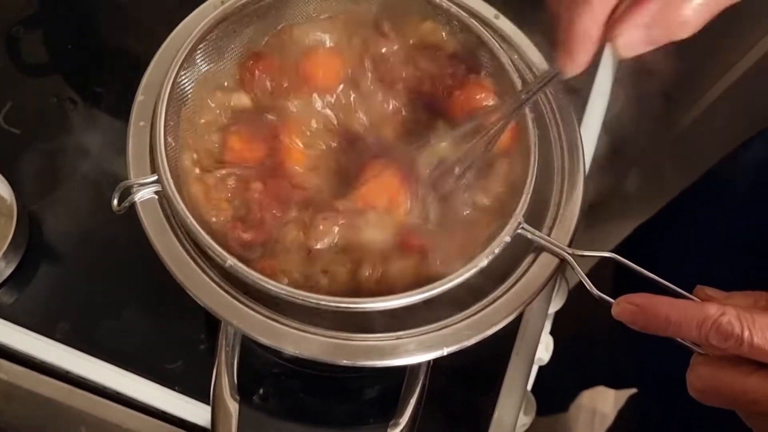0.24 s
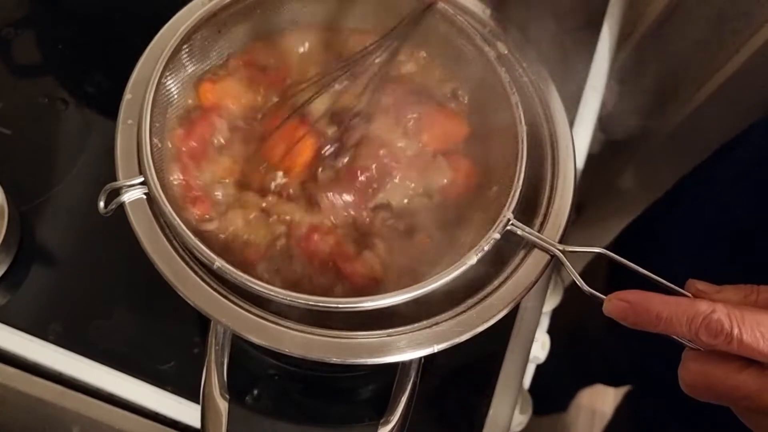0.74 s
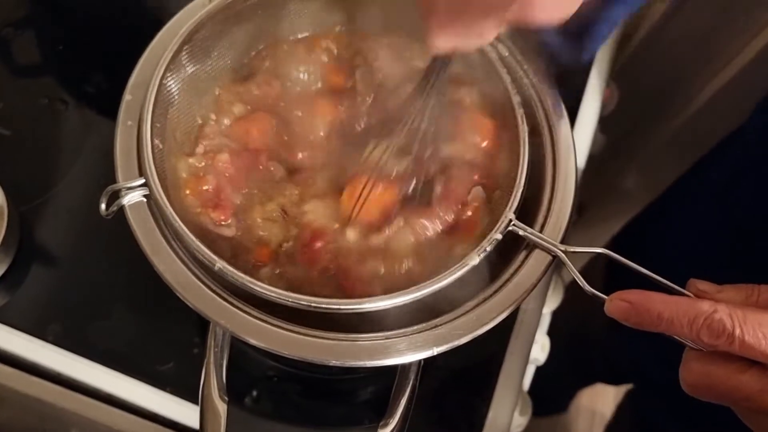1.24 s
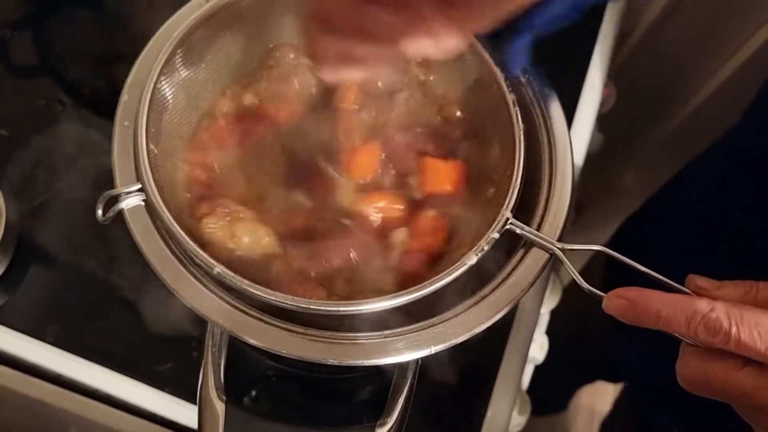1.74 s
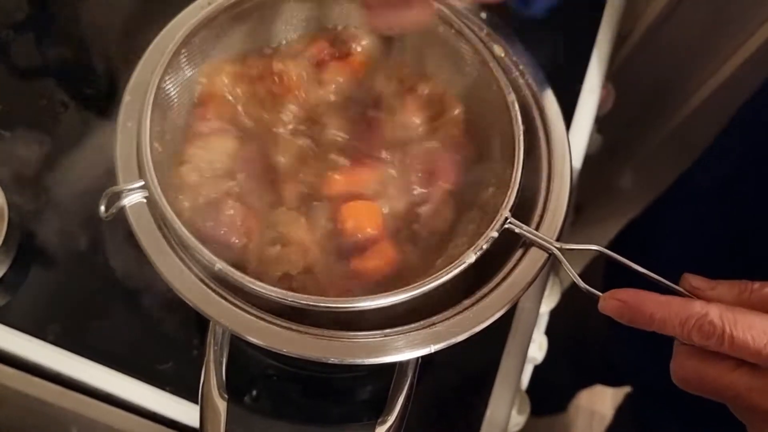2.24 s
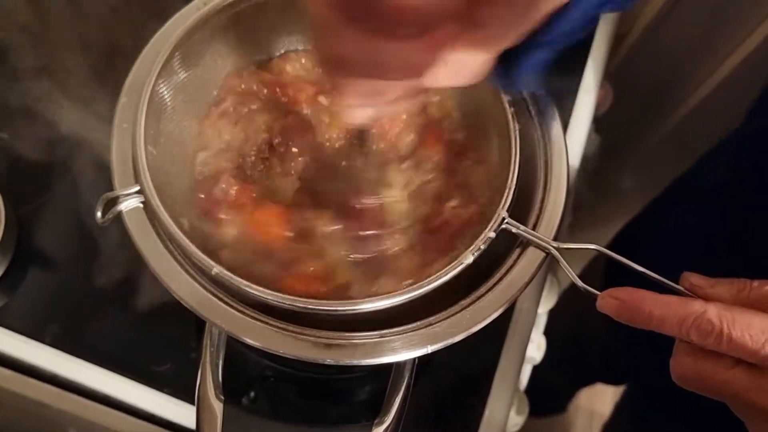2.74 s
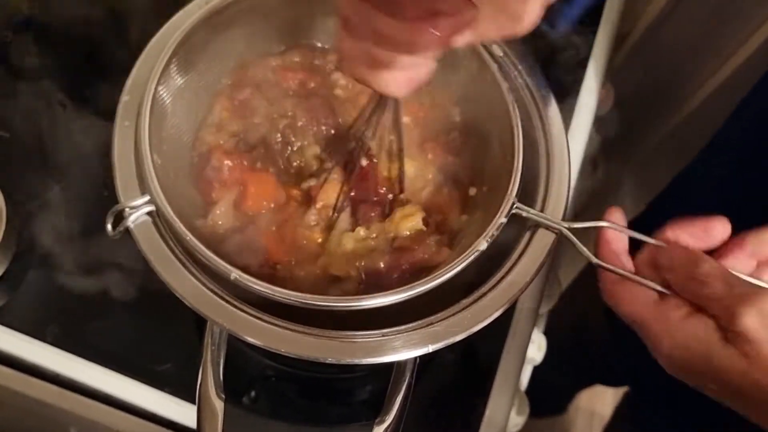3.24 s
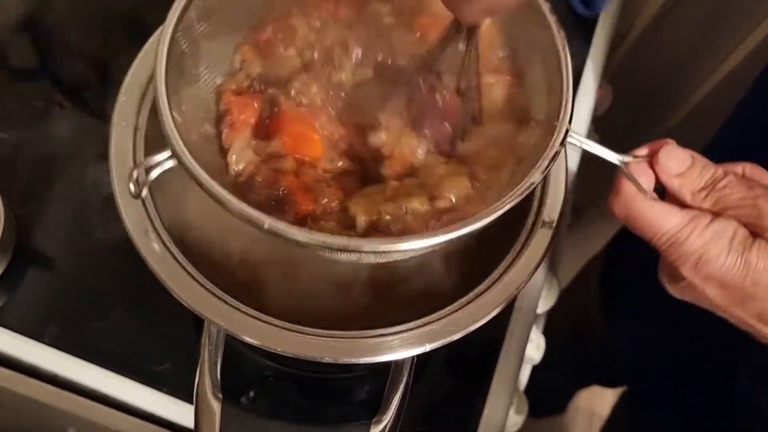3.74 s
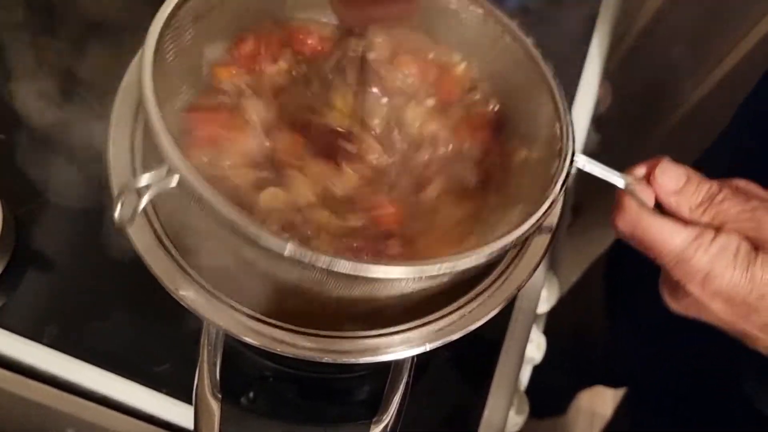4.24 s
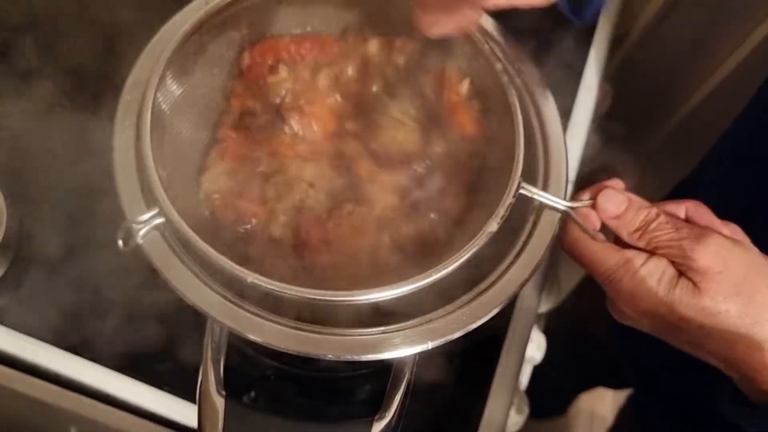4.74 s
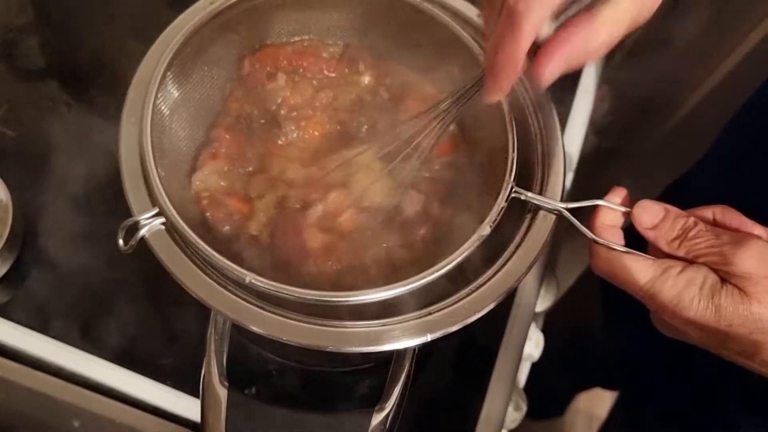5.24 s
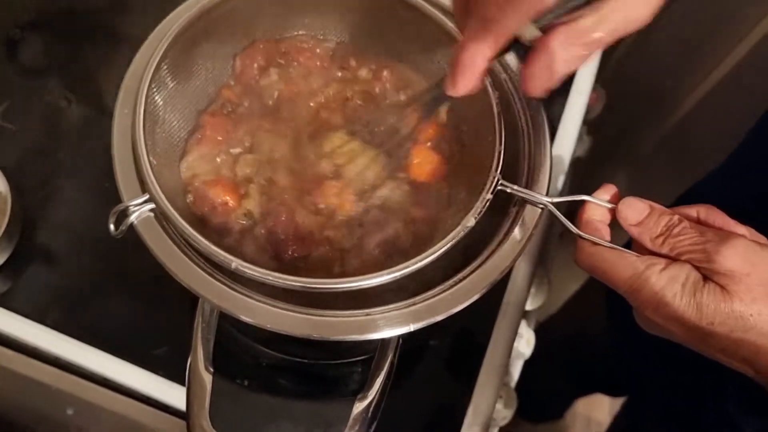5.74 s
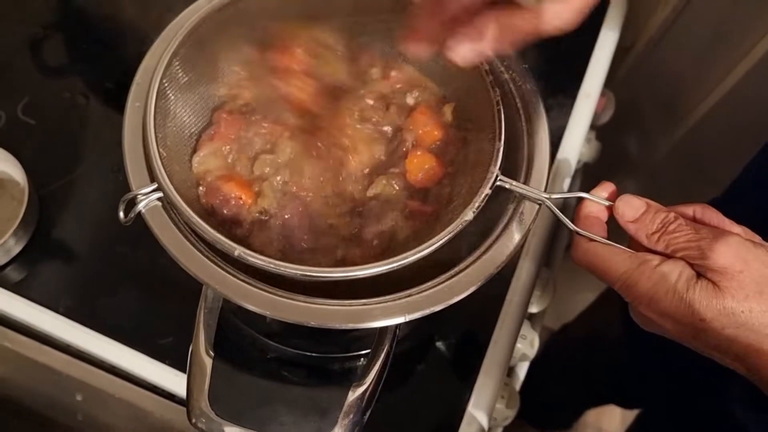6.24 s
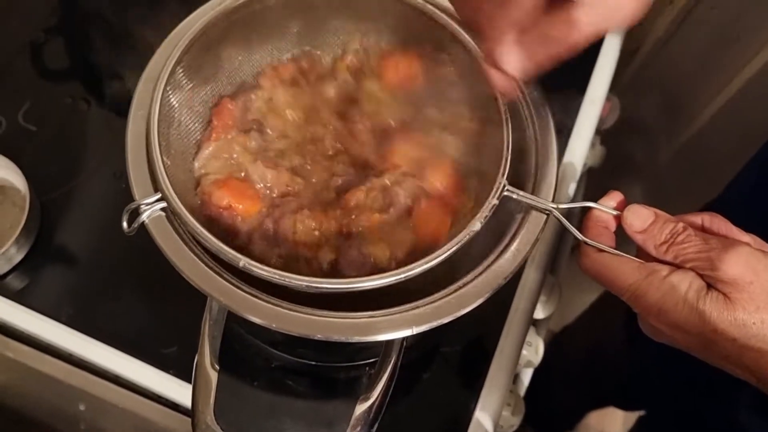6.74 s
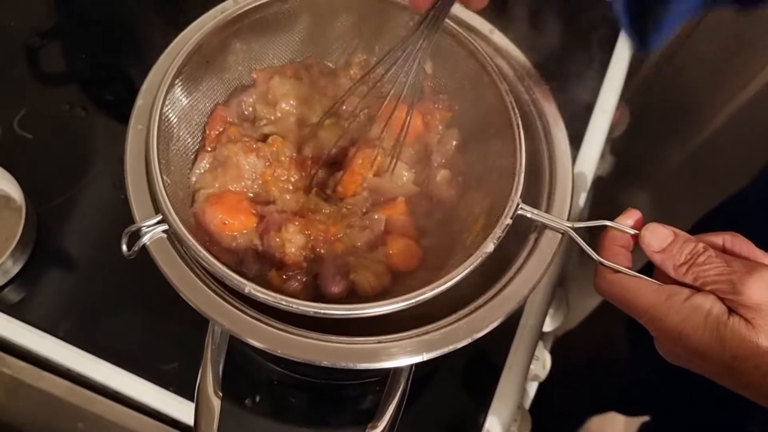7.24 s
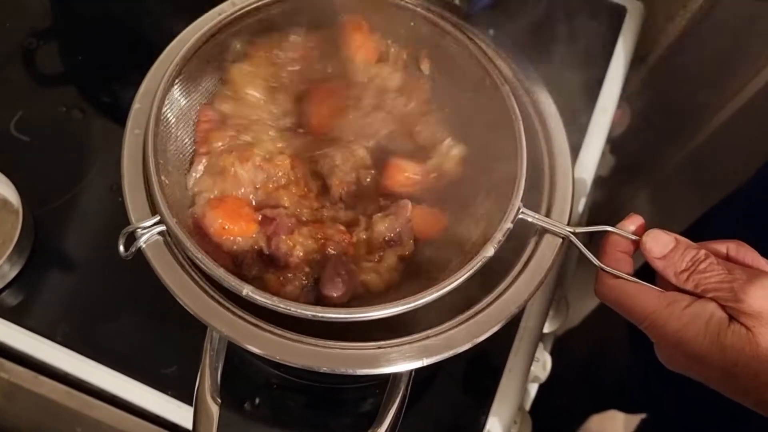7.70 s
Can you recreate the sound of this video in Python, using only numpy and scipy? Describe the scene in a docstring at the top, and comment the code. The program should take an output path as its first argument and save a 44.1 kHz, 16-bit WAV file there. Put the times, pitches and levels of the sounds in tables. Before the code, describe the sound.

Fast, uneven metallic scraping of a whisk on wire mesh, with sticky pulp squishing and popping under it. The bowl and stove thud softly as the sieve is pushed and rattles on the rim. After a few short wet squelches come two bright hard metal knocks, close together. Afterwards strokes are fewer and softer, with tiny wire ticks and a last wet scrape. Close, fairly dry, small room.

```python
"""A wire whisk stirs cooked food through a steel mesh sieve resting on a steel bowl in a kitchen.
From the start, over a steady hush, noise strokes rasp and squelch, steel sings, bowl and stove boom.
Modal knocks of sieve on rim, resonant pulp pops and wire ticks break in; three gliding squelches
follow from 2.6 s. Two hard knocks come near 4.5 and 4.7 s, then the strokes grow sparser.
Two spaced microphone ports stand close by; sparse echoes make the room."""
import sys
import numpy as np
from scipy import signal
from scipy.io import wavfile

SR = 44100
rng = np.random.default_rng(int(sys.argv[2]) if len(sys.argv) > 2 else 0)


def materialize(psi):
    """Save the field psi as 16-bit PCM at rate SR to the path in sys.argv[1].

    A 1-D psi becomes a single channel; in a 2-D psi each row is a channel.
    """
    bounded = np.clip(np.atleast_2d(psi).T, -1, 1)
    quanta = np.round(bounded * 32767).astype(np.int16)
    wavfile.write(sys.argv[1], SR, quanta)


N = 351378
T = np.arange(N) / SR
STEPS = T[::64]  # times at which slow gains are computed

# All table levels are relative.
# kitchen hush spectrum: [freq_hz, density_db_per_hz]
HUSH_SPECTRUM = [(15, -25), (28, -4.5), (42, -3), (70, 3), (256, -23.5), (373, -10.5), (677, -21),
                 (1100, -24.5), (2200, -22.5), (4000, -32), (9000, -44), (16000, -42.5)]
# whisk strokes over the mesh: [middle_s, base_length_s, rasp_db, wet_pulp_db, pulp_hollow_hz]
STROKES = [(0.109, 0.23, -52.5, -69, 1030), (0.315, 0.15, -54, -69, 1070), (0.412, 0.24, -53, -59, 890),
           (0.593, 0.072, -57.5, -74, 1000), (0.674, 0.087, -56, -59, 1310),
           (0.757, 0.16, -52, -71, 1110.0), (1.184, 0.18, -65.5, -60, 840),
           (1.335, 0.12, -54.5, -54.5, 1050), (1.443, 0.11, -52, -55, 990), (1.591, 0.15, -59.5, -56, 1040),
           (1.694, 0.19, -56.5, -71, 1100), (1.807, 0.1, -50, -53, 1090), (1.925, 0.22, -62, -55, 880.0),
           (2.029, 0.41, -56, -55, 1110), (2.156, 0.12, -50.5, -59, 1030), (2.318, 0.25, -56.5, -53, 1010),
           (2.514, 0.07, -55.5, -60, 1180), (2.634, 0.096, -50.5, -50, 950), (2.701, 0.12, -54, -51.5, 950),
           (2.825, 0.22, -55.5, -60.5, 1080), (2.996, 0.13, -50.5, -55.5, 860),
           (3.065, 0.13, -58.5, -53, 830), (3.263, 0.096, -63, -64.5, 1200),
           (3.479, 0.12, -67, -59.5, 1100), (3.604, 0.11, -49, -75, 950), (3.749, 0.1, -52.5, -52.5, 1130),
           (3.929, 0.18, -64.5, -64, 1170), (4.123, 0.22, -61.5, -60.5, 1240.0),
           (4.281, 0.19, -57, -70.5, 1230), (4.455, 0.11, -55.5, -51.5, 1070.0),
           (4.618, 0.035, -58, -84, 980), (4.898, 0.17, -65.5, -58, 970), (5.085, 0.15, -71.5, -66, 920),
           (5.245, 0.14, -62.5, -71, 1030.0), (5.314, 0.14, -51, -46, 865), (5.555, 0.049, -59, -53, 1000),
           (5.751, 0.14, -60, -57.0, 957), (6.201, 0.056, -73, -69, 930),
           (6.385, 0.29, -76.5, -72.5, 920.0), (6.512, 0.041, -69.5, -60.5, 1100.0),
           (6.707, 0.078, -66, -86, 770), (6.825, 0.089, -74, -82, 1110), (6.999, 0.085, -61.5, -53, 1100),
           (7.525, 0.15, -67.5, -61.5, 1100), (7.634, 0.11, -58.5, -59, 1060),
           (7.796, 0.088, -66.5, -83, 1220), (7.907, 0.078, -51, -44.5, 1140)]
# whisk resting on the mesh between strokes: [time_s, rasp_db]
RESTING = [(0.0, -59.5), (0.8, -61.5), (0.92, -88), (1.25, -76), (1.4, -67), (2.2, -63.5), (3.05, -60.5),
           (3.38, -78.5), (3.7, -55.5), (4.2, -96), (4.4, -77), (4.55, -54), (5.0, -77.5), (5.18, -100),
           (5.45, -60.5), (5.9, -89), (6.4, -75.5), (7.0, -66), (7.12, -79.5), (7.45, -97), (7.97, -64)]
# rasp on the mesh: [freq_hz, density_db_per_hz]
MESH_SPECTRUM = [(290, -26), (500, -1), (678, -11.5), (1060, -1), (1180, -2.5), (1690, -6.5), (3750, 1.5),
                 (4600, -4.5), (7210, -7), (9920, -20), (14000, -14), (16000, -25)]
# sieve and rim modes: [freq_hz, hook_strike_db, rim_strike_db, base_t60_s]
STEEL_MODES = [(728, -18, -9, .19), (922, -12, -9, .13), (991, -22, 1, .18), (1102, -20, -11, .18),
               (1240, -5, -4, .03), (1876, -16, -22, .14), (1990, -22, -20, .25), (2455, -12, -4, .2),
               (2484, -5, -12, .15), (2748, 1, -12, .38), (2832, -9, -12, .12), (3130, -12, -13, .12),
               (3420, -12, -11, .1), (3500, -1, -4, .035), (3550, -7, -11, .16), (3621, -5, -14, .2),
               (3672, -8, -4, .16), (3780, -2, -4, .2), (3933, -10, -1, .16), (3988, -5, -12, .28),
               (4525, -16, -11, .15), (5066, -10, -14, .2), (5775, -13, -11, .13), (5975, -8, -13, .13),
               (6205, -10, -11, .09), (6800, -16, -13, .13), (6968, -7, -18, .17), (7531, -11, -15, .11),
               (7760, -11, -15, .11), (8515, -11, -11, .07)]
# steel on steel: [freq_hz, density_db_per_hz]
CRACK_SPECTRUM = [(400, -38), (1000, -22), (1600, -18), (3300, -6), (4800, -10), (7000, -10), (10500, -19),
                  (13000, -18), (16000, -22)]
# lines of the faintly singing steel: [freq_hz, width_hz, level_db]
SINGING_LINES = [(1975, 70, -2), (2745, 36, -9)]
# level of the singing: [time_s, level_db]
SINGING_LEVEL = [(0, -60), (.75, -63), (.9, -79), (1.4, -72), (2.9, -71), (3.15, -83), (3.4, -69),
                 (3.6, -64), (4.3, -67.5), (4.95, -63), (5.15, -74), (5.6, -64.5), (6.1, -91.5),
                 (6.32, -72), (6.72, -67.5), (6.85, -82), (7.1, -70.5), (7.5, -78.5), (7.97, -79)]
# modes of the air in the bowl: [freq_hz, base_width_hz, level_db]
BOWL_MODES = [(356, 16, 2.5), (380.6, 36.7, 5.5), (385, 24, -5)]
# modes of the stove top: [freq_hz, base_width_hz, level_db]
STOVE_MODES = [(62.5, 12.3, -5.5), (77, 24.7, 3), (106.8, 10.2, -1.5), (140.9, 13, -1.5)]
# mode of the pot under the bowl: [freq_hz, base_width_hz, level_db]
POT_MODES = [(204.9, 11.3, 0.023)]
# pushes on the sagging mesh that boom in the bowl: [time_s, level_db]
PUSHES = [(0.072, -41.5), (0.143, -45.5), (0.216, -49), (0.361, -44.5), (0.455, -47.5), (0.51, -54),
          (0.676, -49.5), (0.744, -48), (0.791, -44), (1.162, -56), (1.342, -42.5), (1.477, -44.5),
          (1.585, -48.5), (1.747, -46.5), (1.829, -46.5), (1.98, -49), (2.037, -42.5), (2.12, -47.5),
          (2.202, -44.5), (2.297, -49.5), (2.393, -46.5), (2.47, -52), (2.545, -53), (2.687, -40.5),
          (2.833, -48.5), (2.944, -59), (3.016, -47), (3.106, -41.5), (3.222, -50.5), (3.474, -51.5),
          (3.623, -47), (3.715, -46), (3.79, -49), (3.884, -51.5), (4.103, -58), (4.32, -62), (4.471, -43),
          (4.556, -48), (4.637, -60.5), (4.729, -37.5), (4.805, -40.5), (4.91, -53.5), (5.027, -61.5),
          (5.104, -57.5), (5.218, -53.5), (5.292, -42.5), (5.349, -43.5), (5.478, -50.5), (5.537, -56),
          (5.77, -49), (6.413, -58.5), (6.527, -59), (6.717, -62), (6.75, -65), (7.029, -51), (7.53, -54.5),
          (7.639, -56.5), (7.916, -48)]
# bowl rocking on the stove top: [time_s, stove_db, pot_db]
ROCKS = [(0.049, -42.5, -52), (0.215, -50, -65), (0.365, -42.5, -53), (0.645, -47.5, -58.5),
         (0.767, -89, -46.5), (1.353, -45, -50.5), (1.51, -48, -53.5), (1.736, -43, -54),
         (1.94, -51.5, -60.5), (2.105, -47, -53.5), (2.221, -53.5, -53), (2.443, -44.5, -50.5),
         (2.597, -55, -51.5), (2.791, -42.5, -59), (2.932, -71, -58), (3.11, -45.5, -50), (3.478, -56, -65),
         (3.68, -49.5, -57.5), (4.08, -73, -73), (4.463, -50, -75), (4.54, -47, -60.5), (4.726, -38, -46),
         (4.921, -85.5, -60.5), (5.151, -53, -72), (5.281, -49, -61), (5.365, -55.5, -45.5),
         (5.663, -65.5, -78), (5.755, -53, -59.5), (6.24, -82.5, -88.5), (6.434, -57.5, -67),
         (6.559, -54, -65), (6.873, -52.5, -61.5), (7.026, -57.5, -52.5), (7.511, -66, -76),
         (7.643, -56, -64.5), (7.94, -55, -56.5)]
# sieve against rim: [start_s, level_db, treble_db, bass_db, rise_s (at least 0.0002),
# ring_factor (at least 0.5), place (0 hook, 1 rim)]
KNOCKS = [(0.053, -24.5, -32.5, -29.5, 0.00017, 0.44, 0.82), (0.3424, -33, -39, -43, 0.0019, 0.41, 0.98),
          (0.663, -32, -47, -49, 0.001, 0.45, 0.59), (1.3263, -27.5, -63, -33.5, 0.00058, 0.43, 0.71),
          (1.722, -24.5, -54, -52, 0.0002, 0.42, 0.34), (2.074, -27, -52, -50, 0.00057, 0.43, 0.46),
          (2.4256, -30, -45, -43, 0.0002, 0.4, 0.58), (2.7738, -28.5, -42, -49, 0.00082, 0.69, 0.24),
          (3.0905, -29.5, -55, -34, 0.00046, 0.42, 0.7), (3.467, -37.5, -73, -62, 0.00091, 0.44, 0.29),
          (3.5696, -32, -46, -41.5, 0.0021, 0.89, 0.19), (3.584, -22.5, -26, -52, 0.0018, 0.92, 0.05),
          (3.652, -22.5, -26, -63, 0.0016, 0.93, 0.057), (4.3168, -29.5, -42.5, -49, 0.00017, 0.43, 1),
          (4.4933, -10.5, -13.5, -38, 0.00096, 1, 0.07), (4.6991, -8.5, -10.5, -28.5, 0.0018, 1, 1),
          (7.895, -36, -57.5, -48, 0.0018, 0.62, 0.39)]
# pops of pulp: [start_s, level_db, pitch_hz, left_right_db]
POPS = [(0.185, -41.5, 2680, -4), (0.286, -37, 2670, 8), (0.3586, -31.5, 2500, 5), (0.477, -37.5, 2440, 2),
        (0.599, -48, 2110, -3), (0.7244, -39.5, 2140, 2), (1.0438, -42.5, 1190, -7), (1.1114, -48, 2700, 5),
        (1.651, -32, 1180, 2), (1.6841, -38, 2030, 6), (2.128, -32, 3100, 5), (2.156, -32.5, 1010, -4),
        (2.474, -41, 1900, 5), (2.9443, -38.5, 2000, 1), (3.189, -42, 3620, -1), (3.254, -40.5, 1980, 2),
        (3.625, -39, 1290, -6), (3.8207, -37.5, 3050, 0), (3.905, -32.5, 2590, 3), (3.9326, -36.5, 1170, 1),
        (4.0324, -47.5, 1800, 3), (4.106, -39, 1190, 1), (4.23, -33, 2540, 4), (4.253, -37.5, 1960, 8),
        (4.318, -33.5, 2080, 2), (5.194, -55.5, 1010, -12), (5.517, -39, 2200, -3), (5.7107, -45, 2030, 5),
        (5.9306, -57, 1980, 1), (6.024, -46.5, 2630, -1), (6.171, -52, 1330, -2), (6.1955, -49, 2700, 6),
        (6.2098, -52.5, 3270, -9), (6.265, -49.5, 2700, 1), (6.281, -46, 1340, 1), (6.506, -60, 1930, -1),
        (6.6886, -39.5, 2480, 6), (6.961, -43, 2770, 4), (7.0516, -33.5, 2480, 0),
        (7.1407, -38, 2570, -0.5), (7.489, -47, 1950, 7), (7.738, -48, 2760, 7), (7.7574, -52, 3100, 1),
        (7.771, -45, 2700, 8), (7.883, -42, 1230, 5)]
# single wires flicking over a strand: [start_s, level_db, pitch_hz, left_right_db]
TICKS = [(1.1418, -40, 3800, 4), (1.484, -37, 4630, -13), (1.875, -25, 4350, 4), (2.589, -41, 4370, 3),
         (3.812, -33, 4100, 9), (3.868, -35.5, 4670, -15), (4.0464, -35, 5100, -7),
         (4.139, -58, 3940, -1.0), (4.2196, -29.5, 4220, 2), (4.2613, -40, 4100, 5), (5.08, -49, 3700, -7),
         (5.112, -42.5, 4140, -7), (5.431, -52, 3860, -3.0), (5.6094, -53, 3950, 5), (6.0415, -50, 5530, 4),
         (6.0711, -52, 7160, 6), (6.1469, -47, 3870, -1.5), (6.19, -59, 7000, 2), (6.203, -53, 8000, 0),
         (6.2643, -44.5, 6940, 4), (6.286, -47, 11000, 0), (6.328, -56, 11000, 3), (6.413, -57, 11000, 0),
         (6.446, -54, 10000, 0), (6.4203, -48, 4900, 1), (6.457, -47, 4800, -13), (6.589, -45.5, 3900, -21),
         (6.797, -38.5, 7050, 6), (6.8655, -37, 3800, -3), (6.91, -41, 6360, -2),
         (7.2373, -49.5, 4200, -0.5), (7.5985, -38.5, 3680, -10), (7.8047, -58, 3920, 11)]
# air squeezed out of the pulp: [start_s, length_s, level_db, start_hz, middle_hz, end_hz]
SQUELCHES = [(2.607, 0.067, -44, 685, 850, 1130), (2.975, 0.068, -43.5, 940, 830, 830),
             (3.718, .065, -48.5, 940, 1150, 850)]
# decay of the room: [freq_hz, t60_s]
ROOM_DECAY = [(200, 0.33), (1000, 0.11), (4000, 0.1), (12000, 0.067)]
# difference of the ports: [freq_hz, left_right_db]
PORT_BALANCE = [(60, 1), (130, 0.5), (290, -3.5), (640, -1), (1410, -1), (3100, -7.5), (6820, 3.5),
                (15000, 0)]

HUSH_DB, EDGE_HZ = -60, 15900
STROKE_ENDS_DB = -19.5  # at both ends of a stroke
REST_PULP_DB, REST_BOWL_DB, REST_RING_DB, STROKE_RING_DB = 1.5, 4, 7, -8.5  # against the rasp
PULP_SPAN, RING_SPAN = 1.36, 1  # stroke length factors
GRIT_DB, REST_GRIT_DB = -14.5, 9  # against the rasp
PUSH_RISE_S, PUSH_T60_S = 0.048, 0.11
ROCK_RISE_S, STOVE_T60_S, POT_T60_S, STOVE_IDLE_DB = 0.056, 0.8, 0.34, -75
SOFT_SHARE, SOFT_ABOVE_HZ = .6, 4200  # soft contacts hardly reach the high modes
POP_T60_S, POP_T60_HZ = 0.041, 2500  # t60 at this pitch; in proportion to pitch elsewhere
POP_WIDTH_HZ, TICK_T60_S, TICK_WIDTH = 570, 0.01, 0.43  # tick width: share of pitch
SQUELCH_WIDTH_HZ, SQUELCH_HALF_DB = 120, -6.5
STRUCK_ROOM_DB, RING_ROOM_DB = -4, -9  # room share of sharp contacts; of rim and bowl
RIM_LAG, PULP_LAG, BOWL_LAG = 5, 19, 22  # samples later at the far (right) port


def amp(db):
    """Converts decibels to an amplitude ratio."""
    return 10 ** (np.asarray(db) / 20)


def evened(x):
    """Scales to an RMS of 1."""
    return x / np.sqrt(np.mean(x ** 2) + 1e-20)


def read(points, hz):
    """Interpolates a table over log frequency."""
    f, value = np.transpose(points)
    return np.interp(np.log(hz + 1), np.log(f + 1), value)


def add(mix, start_s, sound):
    """Adds a sound in place, cut at the end of the mix."""
    part = mix[..., round(start_s * SR):][..., :sound.shape[-1]]
    part += sound[..., :part.shape[-1]]


def colour(x, points):
    """Filters by a spectrum, causally: the phase follows from the log gain."""
    hz = abs(np.fft.fftfreq(4096, 1 / SR))
    log_gain = np.log(amp(np.maximum(read(points, hz), -90)))
    taps = np.fft.ifft(np.exp(np.conj(signal.hilbert(log_gain)))).real[:2048]
    taps = taps.reshape((1,) * (x.ndim - 1) + (-1,))
    return signal.oaconvolve(x, taps, axes=-1)[..., :x.shape[-1]]


def ring(x, hz, width_hz):
    """One damped resonance of about unit peak gain."""
    r = np.exp(-np.pi * width_hz / SR)
    c = r * np.cos(2 * np.pi * hz / SR)
    return signal.lfilter([2 * (1 - r), -2 * (1 - r) * c], [1, -2 * c, r * r], x)


def glide(x, hz, width_hz):
    """A resonance that follows the curve hz: shift down to zero, smooth, shift back."""
    turn = np.exp(2j * np.pi * np.cumsum(hz) / SR)
    r = np.exp(-np.pi * width_hz / SR)
    return 2 * (turn * signal.lfilter([1 - r], [1, -r], x / turn)).real


def spread(a, b, same):
    """A wide source: left port hears a, right port a share of a and the rest b."""
    return np.array([a, same * a + np.sqrt(1 - same ** 2) * b])


def slips(per_s, spread_db):
    """Wires catching on strands: a train of clicks of uneven size and sign."""
    when, luck, sign = rng.random((int(per_s * N / SR), 3)).T
    size = amp(spread_db * np.minimum(-np.log(1 - luck), 3)) * np.sign(sign - .5)
    return evened(np.bincount((when * N).astype(int), size, N))


def judder(hz, depth_db):
    """Trembling wire pressure: a gain from low-passed noise."""
    b, a = signal.butter(1, hz / (SR / 2))
    return amp(depth_db * evened(signal.lfilter(b, a, rng.standard_normal(N))))


def resting(rest_db):
    """Power of the resting contact at STEPS."""
    return amp(2 * (np.interp(STEPS, *np.transpose(RESTING)) + rest_db))


def strokes(axis, span, rest_db):
    """Gain over time: strokes swell and fade over the resting contact; powers add."""
    rows = np.array(STROKES)[:, :, None]
    half_s = span * rows[:, 1] / 2
    level_db = rows[:, axis] + STROKE_ENDS_DB * ((STEPS - rows[:, 0]) / half_s) ** 2
    power = resting(rest_db) + amp(2 * level_db).sum(0)
    return np.interp(T, STEPS, np.sqrt(power))


def jolts(rows, axis, rise_s, t60_s, idle):
    """Gain over time: each jolt rises quickly and dies away, over an idle power."""
    rows = np.array(rows)[:, :, None]
    since = STEPS - rows[:, 0]
    shape_db = np.where(since < 0, -12 * (since / rise_s) ** 2, -60 * since / t60_s)
    power = idle + amp(2 * (rows[:, axis] + shape_db)).sum(0)
    return np.interp(T, STEPS, np.sqrt(power))


def hush():
    """Steady air of the room: coloured noise, alike at both ports only in the bass."""
    a, b = colour(rng.standard_normal((2, N)), HUSH_SPECTRUM)
    low = signal.sosfilt(signal.butter(2, 250, fs=SR, output="sos"), a - b)
    return amp(HUSH_DB) * evened(np.array([a, b + .9 * low]))


def shaking():
    """Gain of the sieve's ringing, which follows the strokes."""
    return amp(STROKE_RING_DB) * strokes(axis=2, span=RING_SPAN, rest_db=REST_RING_DB)


def mesh_rasp():
    """Wires slip over strands: juddering click trains in the colour of the mesh."""
    rub = spread(slips(2400, 4.), slips(2400, 4.), .5) * judder(35, 3.5)
    rasp = colour(rub, MESH_SPECTRUM)
    # level is set by the part above 5 kHz
    top = signal.sosfilt(signal.butter(4, 5000, "high", fs=SR, output="sos"), rasp)
    return rasp / np.std(top) * strokes(axis=2, span=0.93, rest_db=-4.5)


def dragged_steel():
    """Slipping wires excite the middle modes of the sieve."""
    drag = slips(700, 4.) * judder(30, 3.)
    steel = sum(amp(0.33 * db) * ring(drag, hz, 4.6 / t60_s)
                for hz, db, _, t60_s in STEEL_MODES if 1600 < hz < 5000)
    return shaking() * evened(steel)


def wet_pulp():
    """Pulp squelches: slips ring gliding hollows, and tiny cavities burst at nine pitches."""
    hollow_hz = np.interp(T, *np.array(STROKES)[:, ::4].T)
    pulp = slips(500, 6.3) * judder(25, 4.5)
    pulp = glide(glide(pulp, hollow_hz, 160), hollow_hz, 450)
    # deeper, duller part
    slosh = slips(800, 7.6) * judder(25, 8.4)
    slosh = glide(glide(slosh, 0.86 * hollow_hz, 430), 0.58 * hollow_hz, 590)
    fizz = sum(ring(slips(20, 6.4), hz, 0.073 * hz) / np.sqrt(hz)
               for hz in np.geomspace(750, 3600, num=9))
    blend = amp(-1.5) * evened(pulp) + amp(-1) * evened(fizz) + amp(-10.5) * evened(slosh)
    wet = strokes(axis=3, span=PULP_SPAN, rest_db=REST_PULP_DB) * blend
    return np.array([wet, wet])


def singing():
    """Shaken steel sings in thin lines of narrow-band noise that come and go."""
    level = amp(np.interp(T, *np.transpose(SINGING_LEVEL))) * judder(5, 2.)
    lines = 0
    for hz, width_hz, db in SINGING_LINES:
        noise = rng.standard_normal(N)
        lines = lines + amp(db) * evened(ring(ring(noise, hz, width_hz), hz, width_hz))
    return level * lines


def grit():
    """Now and then a wire snaps sharply off a strand: sparse clicks, partly shared by the ports."""
    snaps = colour(spread(slips(90, 5.), slips(90, 5.), .6), CRACK_SPECTRUM)
    return amp(GRIT_DB) * strokes(axis=2, span=0.59, rest_db=REST_GRIT_DB) * evened(snaps)


def boom_body(per_s, push, modes):
    """Pushed slips ring a body's modes, scaled by its response to white noise."""
    force = np.array([slips(per_s, 2.5) * push, rng.standard_normal(N)])
    pushed, reference = sum(amp(db) * ring(ring(force, hz, 1.06 * w), hz, 5.2 * w)
                            for hz, w, db in modes)
    return pushed / np.std(reference)


def boom():
    """Soft pushes ring the bowl's air; rocking shakes stove and pot: (bowl, stove, pot)."""
    bowl_push = jolts(PUSHES, 1, PUSH_RISE_S, PUSH_T60_S, idle=resting(REST_BOWL_DB))
    stove_push = jolts(ROCKS, 1, ROCK_RISE_S, STOVE_T60_S, idle=amp(2 * STOVE_IDLE_DB))
    pot_push = jolts(ROCKS, 2, ROCK_RISE_S, POT_T60_S, idle=0)
    return (boom_body(300, bowl_push, BOWL_MODES),
            boom_body(160, stove_push, STOVE_MODES),
            boom_body(160, pot_push, POT_MODES))


def knock(level_db, treble_db, bass_db, rise_s, ring_factor, place):
    """A contact rings the steel, cracks in the treble and thumps stove, pot and bowl: (steel, thump)."""
    t = np.arange(SR // 3) / SR
    ring_factor = max(ring_factor, .5)
    hz, hook_db, rim_db, t60_s = np.transpose(STEEL_MODES)[:, :, None]
    phase, luck, turn = rng.random((3, len(STEEL_MODES), 1))
    mode_db = (1 - place) * hook_db + place * rim_db + 2 * luck
    mode_db = mode_db + SOFT_SHARE * (treble_db - level_db) * (hz > SOFT_ABOVE_HZ)
    # fast drop while the parts still press together, then free ringing
    t60_s = ring_factor * t60_s
    fading = amp(-60 * t / (.25 * t60_s)) + .7 * amp(-60 * t / t60_s)
    start = 1 - np.exp(-t / max(rise_s, 2e-4))
    # modes radiate from different parts of the rim: phases differ between ports
    rung = np.array([(amp(mode_db) * fading * np.sin(2 * np.pi * (hz * t + phase + p))).sum(0)
                     for p in (0, -.33 * turn)])
    rung = start * rung
    hiss = spread(*rng.standard_normal((2, len(t))), 0.029) * start
    crack = colour(hiss * (amp(-60 * t / 0.13) + 0.33 * amp(-60 * t / 0.24)), CRACK_SPECTRUM)
    jolt = (t - .004) / 0.001
    shove = np.exp(-((t - .012) / 0.0018) ** 2 / 2) - 0.25 * jolt * np.exp(-jolt ** 2)
    thump = sum(amp(db) * ring(shove, f, 0.94 * w)
                for f, w, db in STOVE_MODES + POT_MODES + BOWL_MODES)
    steel = amp(level_db) * rung / abs(rung).max()
    steel = steel + amp(treble_db + 2) * crack / abs(crack).max()
    return steel, amp(bass_db) * thump / abs(thump).max()


def pop(level_db, hz, t60_s, width_hz, left_right_db):
    """A sharp click rings a cavity for a few cycles; a weaker one follows, over a faint rough tone."""
    t = np.arange(SR // 5) / SR
    second = .3 * (t > .007) * np.exp(-abs(t - .007) / .001)
    click = (t == 0) + .5 * rng.standard_normal(len(t)) * (np.exp(-t / .0004) + second)
    snap = ring(ring(click, hz, .5 * width_hz), hz, 1.8 * width_hz)
    tone = ring(ring(rng.standard_normal(len(t)), hz, .12 * hz), hz, .3 * hz)
    tone = tone * (1 - np.exp(-t / .002)) * amp(-60 * t / t60_s)
    both = snap / abs(snap).max() + .35 * tone / abs(tone).max()
    pan = amp([[left_right_db / 2], [-left_right_db / 2]])
    return amp(level_db + 2.5) * both / abs(both).max() * pan


def squelch(length_s, level_db, *pitches_hz):
    """A wet flap flutters: a rough tone that glides, with a weaker one an octave below."""
    u = np.arange(round(length_s * SR)) / (length_s * SR)
    curve_hz = np.polyval(np.polyfit([0, .5, 1], pitches_hz, 2), u)
    noise = rng.standard_normal((2, len(u)))
    tone = 0
    for x, ratio, db in zip(noise, (1, .5), (0, SQUELCH_HALF_DB)):
        narrow = glide(x, ratio * curve_hz, SQUELCH_WIDTH_HZ)
        tone = tone + amp(db) * evened(glide(narrow, ratio * curve_hz, 2 * SQUELCH_WIDTH_HZ))
    return amp(level_db) * np.sin(np.pi * u) * tone


def kitchen(x):
    """Sparse echoes of random sign, other ones for each port, each band dying at its own speed."""
    taps = np.zeros((2, SR // 2))
    at = np.arange(40, SR // 2 - 20, 20) + rng.integers(0, 20, (2, (SR // 2 - 41) // 20))
    np.put_along_axis(taps, at, rng.choice([-1., 1.], at.shape), 1)
    hz, t, bands = signal.stft(taps, SR, nperseg=256)
    decay = amp(-60 * t / read(ROOM_DECAY, hz)[:, None])
    tail = signal.istft(bands * decay, SR, nperseg=256)[1]
    return signal.fftconvolve(x, tail / np.linalg.norm(tail[0]), axes=1)[:, :N]


def scene():
    """Sums direct sound with port lags, room echoes, booms, thumps and hush."""
    steel = mesh_rasp() + dragged_steel() + singing() + grit()
    wet = wet_pulp()
    bowl, stove, pot = boom()
    thumps, clacks, struck = np.zeros(N), np.zeros((2, N)), np.zeros((2, N))
    for start_s, *row in KNOCKS:
        clack, thump = knock(*row)
        add(clacks, start_s, clack)
        add(thumps, start_s, thump)
    for start_s, db, hz, pan_db in POPS:
        add(struck, start_s, pop(db, hz, POP_T60_S * hz / POP_T60_HZ, POP_WIDTH_HZ, pan_db))
    for start_s, db, hz, pan_db in TICKS:
        add(struck, start_s, pop(db - 6.5, hz, TICK_T60_S, TICK_WIDTH * hz, pan_db))
    for start_s, *row in SQUELCHES:
        add(struck, start_s, squelch(*row))
    clacks = clacks + amp(-0.5) * np.array([bowl, np.roll(bowl, BOWL_LAG)])
    near = steel + struck
    far_port = np.roll(near[1], RIM_LAG) + np.roll(wet[1], PULP_LAG)
    direct = np.array([near[0] + wet[0], far_port]) + clacks
    # high-pass: the booms and thumps have little below about 54 Hz
    bass = amp(1.0) * (stove + pot) + thumps
    bass = signal.sosfilt(signal.butter(4, 54, "high", fs=SR, output="sos"), bass)
    to_room = steel + wet + amp(STRUCK_ROOM_DB) * struck + amp(RING_ROOM_DB) * clacks
    return amp(0.44) * direct + amp(0.5) * kitchen(to_room) + bass + hush()


def record(dry):
    """The ports differ in colour; then a low-pass sets the band limit."""
    left = colour(dry[0], [(hz, db / 2) for hz, db in PORT_BALANCE])
    right = colour(dry[1], [(hz, -db / 2) for hz, db in PORT_BALANCE])
    taps = signal.firwin(511, EDGE_HZ, window=("kaiser", 9), fs=SR)
    return signal.oaconvolve(np.array([left, right]), taps[None], "same")


dry = scene()
out = record(dry)
materialize(out)
```